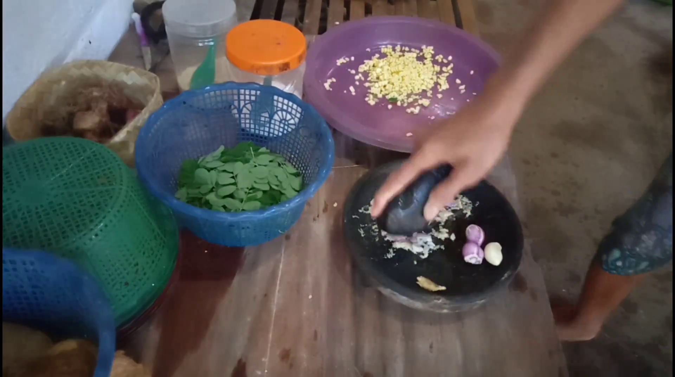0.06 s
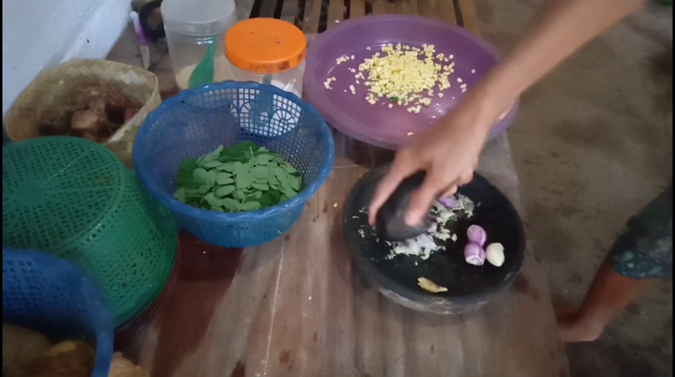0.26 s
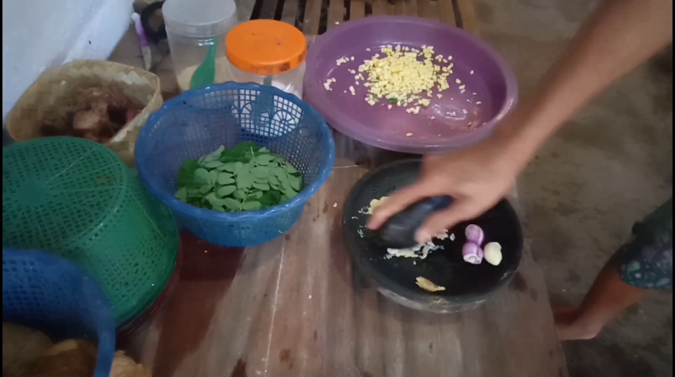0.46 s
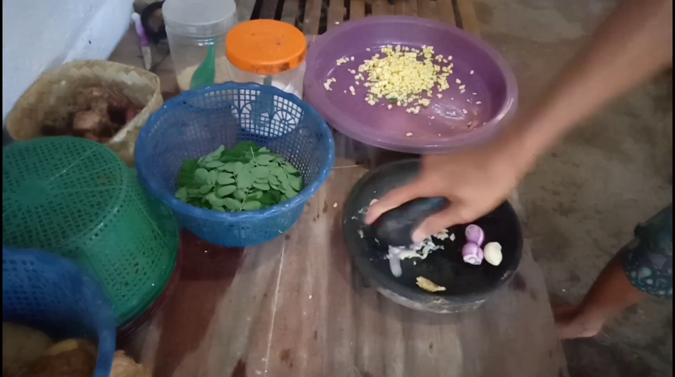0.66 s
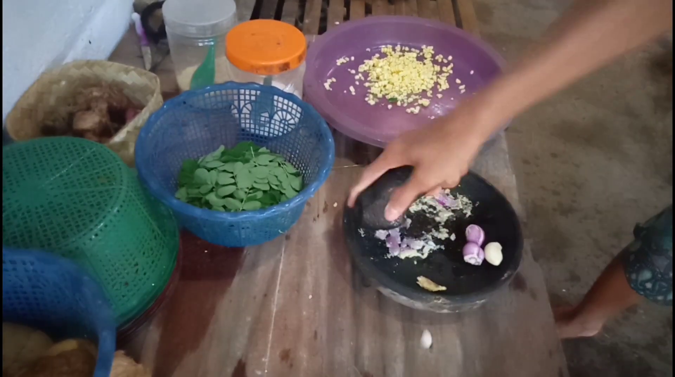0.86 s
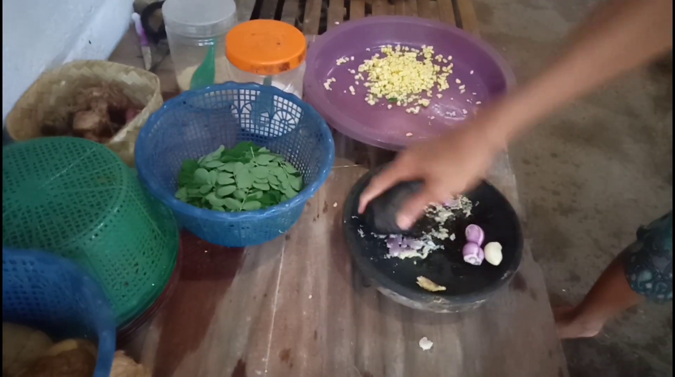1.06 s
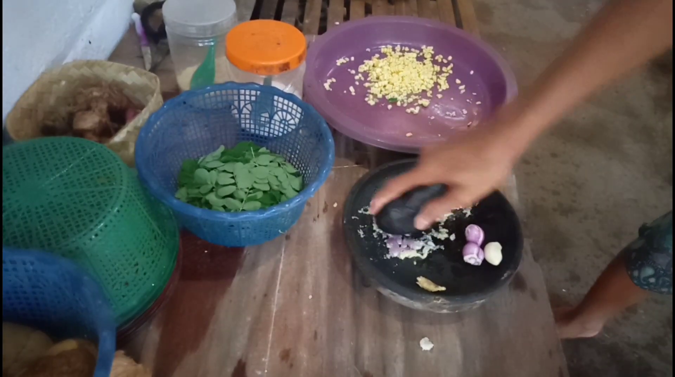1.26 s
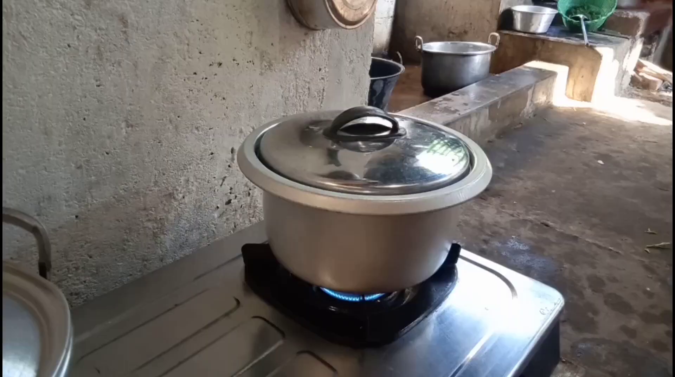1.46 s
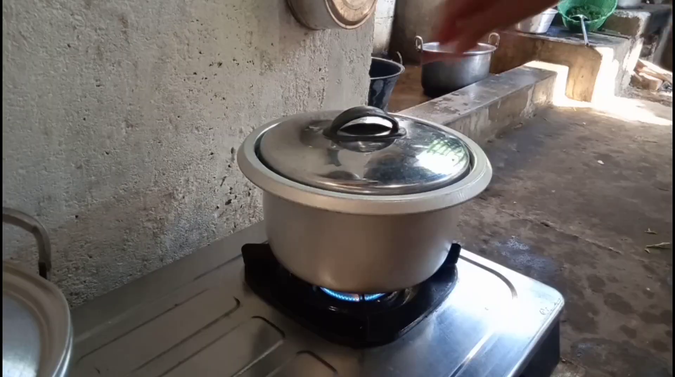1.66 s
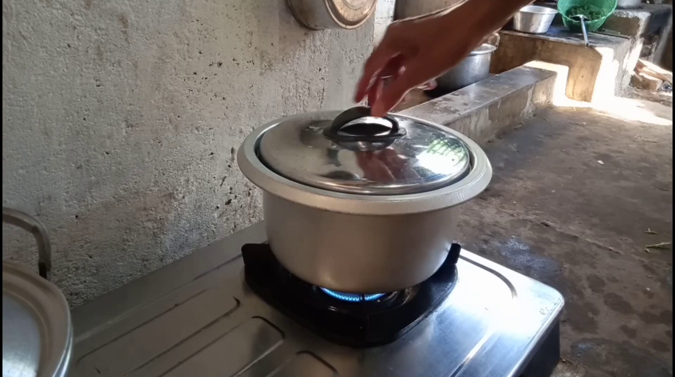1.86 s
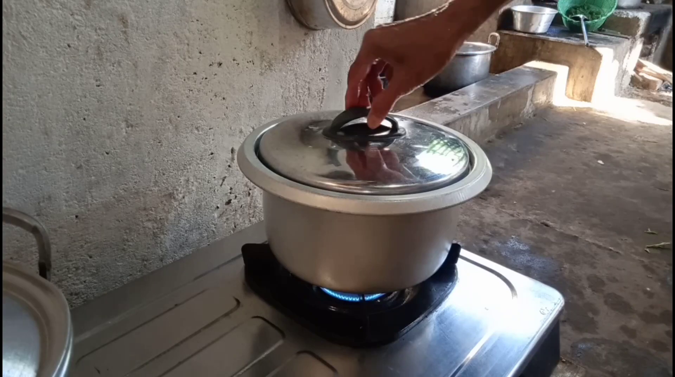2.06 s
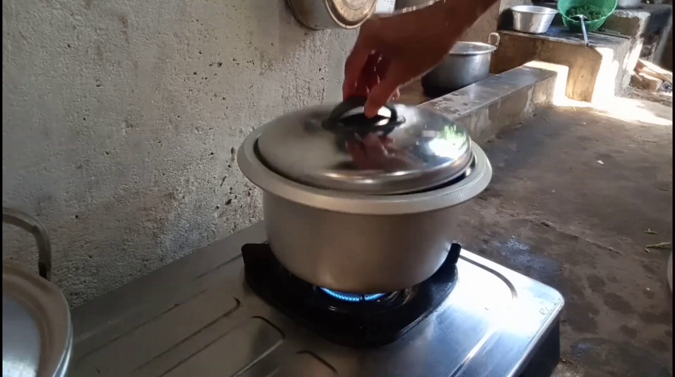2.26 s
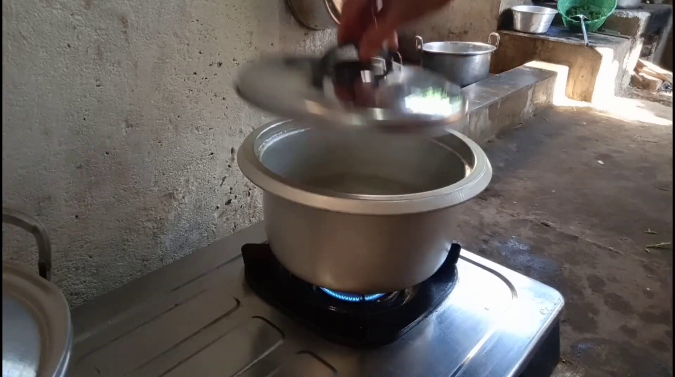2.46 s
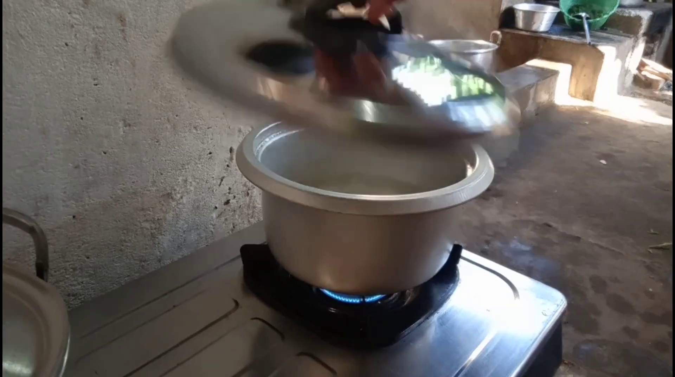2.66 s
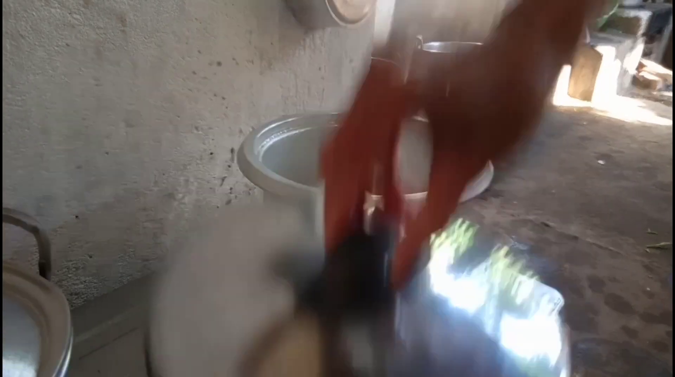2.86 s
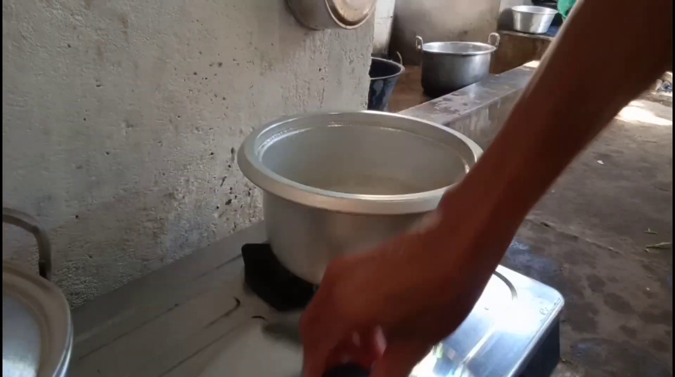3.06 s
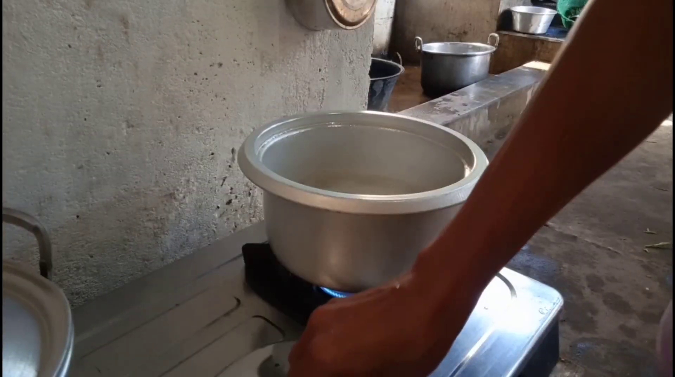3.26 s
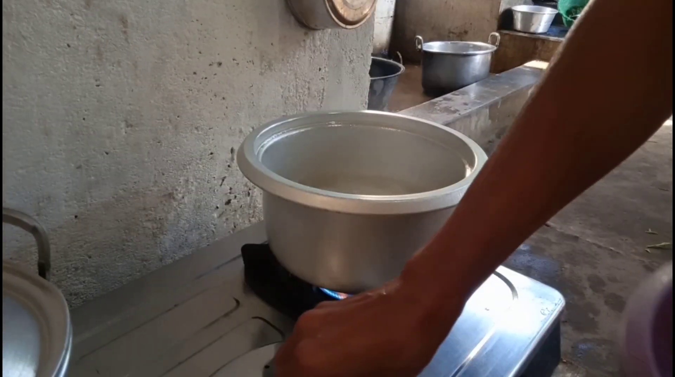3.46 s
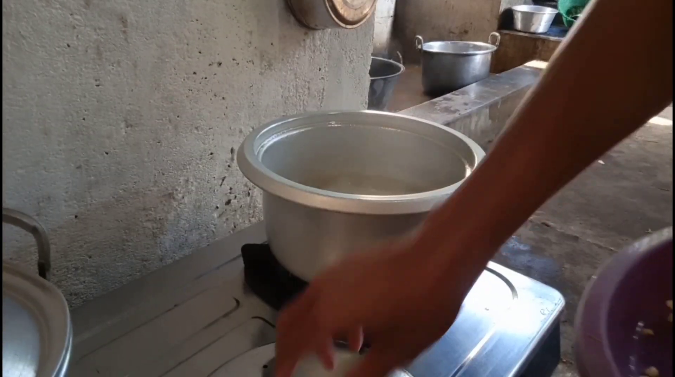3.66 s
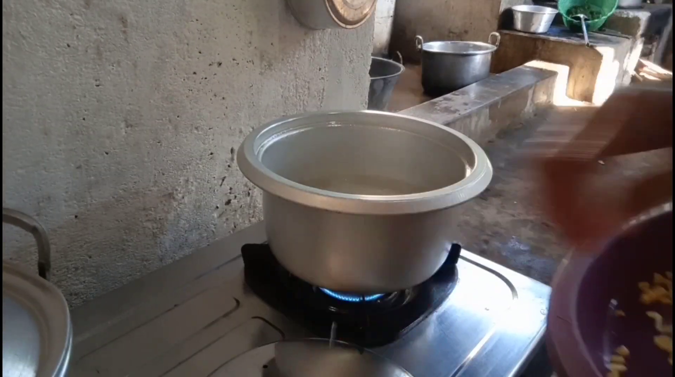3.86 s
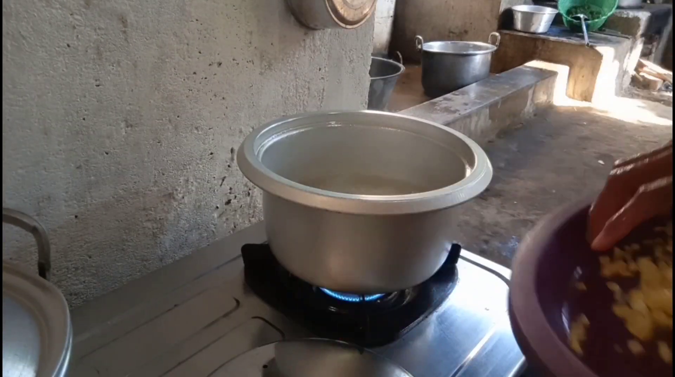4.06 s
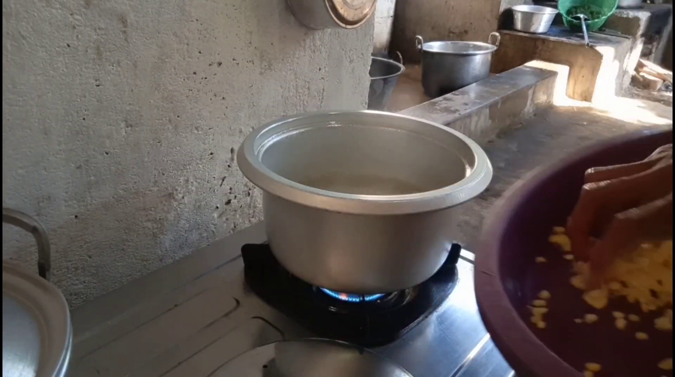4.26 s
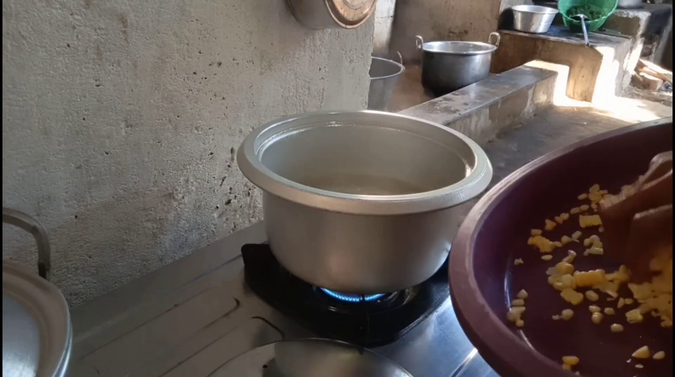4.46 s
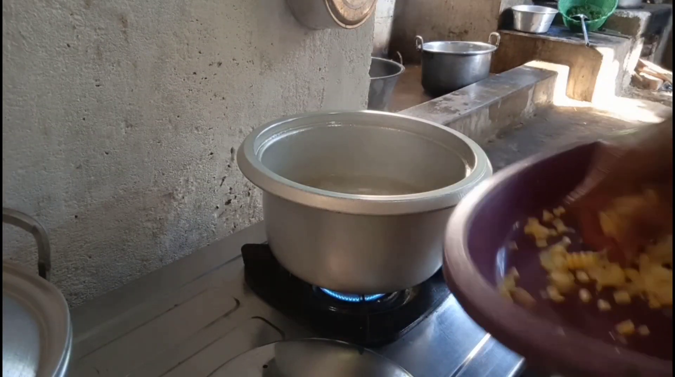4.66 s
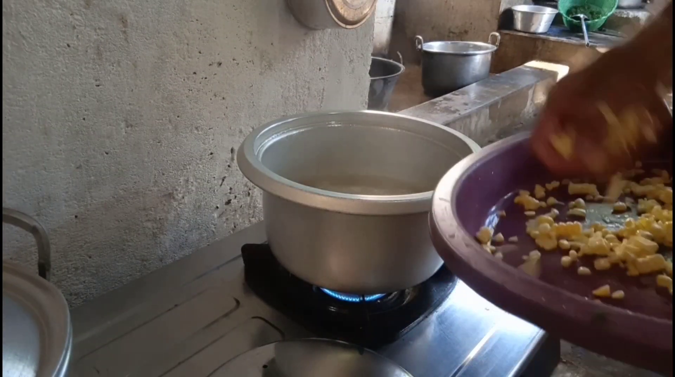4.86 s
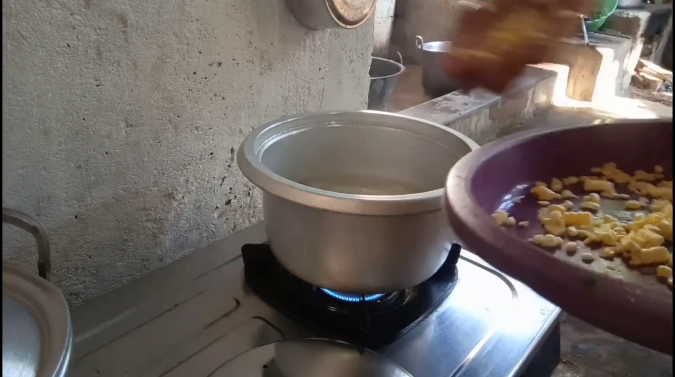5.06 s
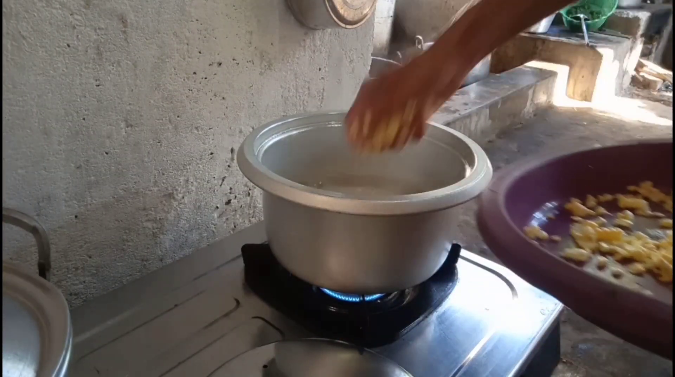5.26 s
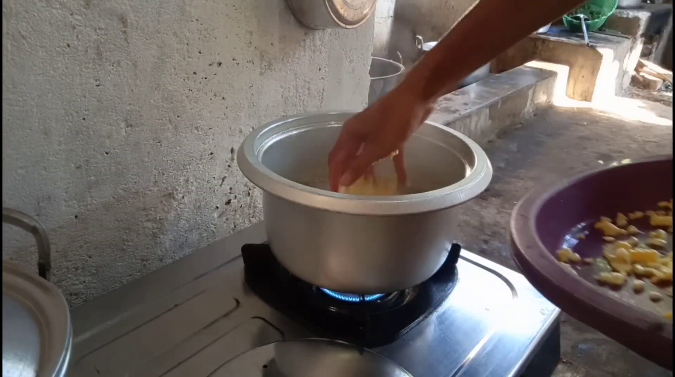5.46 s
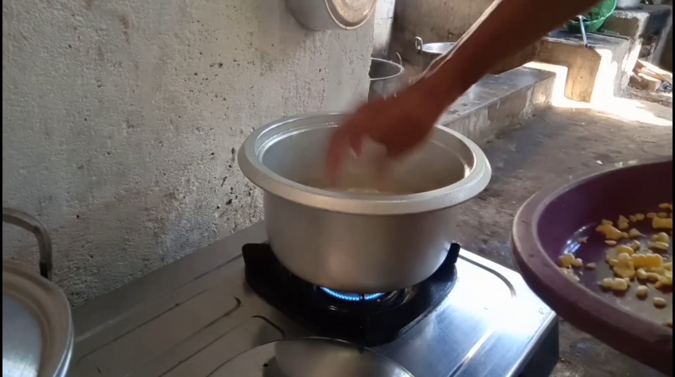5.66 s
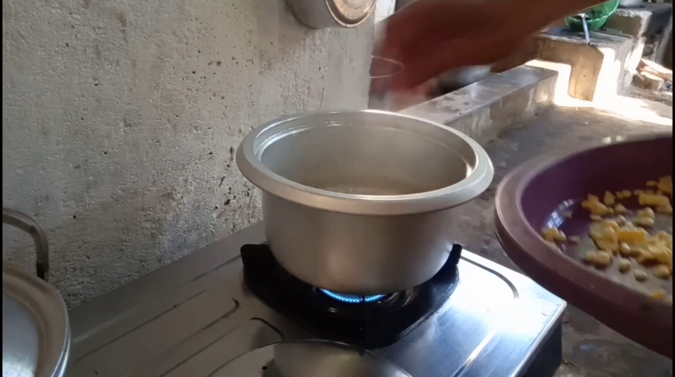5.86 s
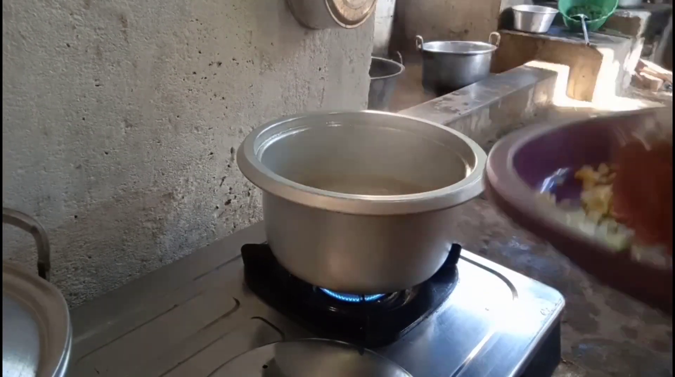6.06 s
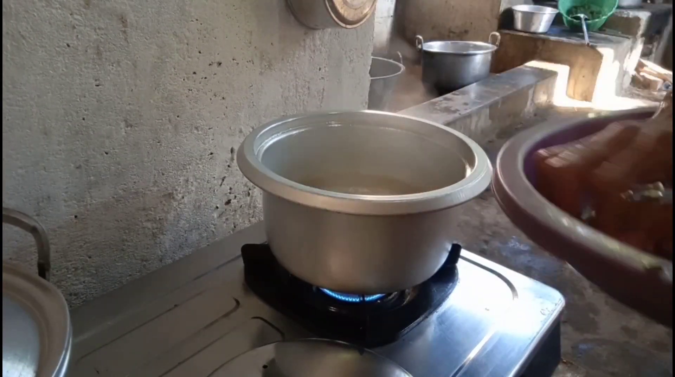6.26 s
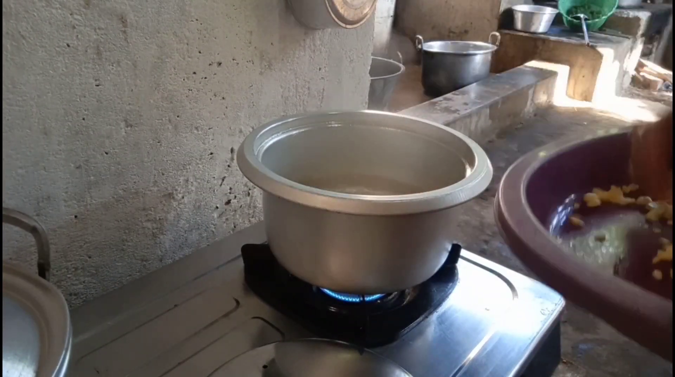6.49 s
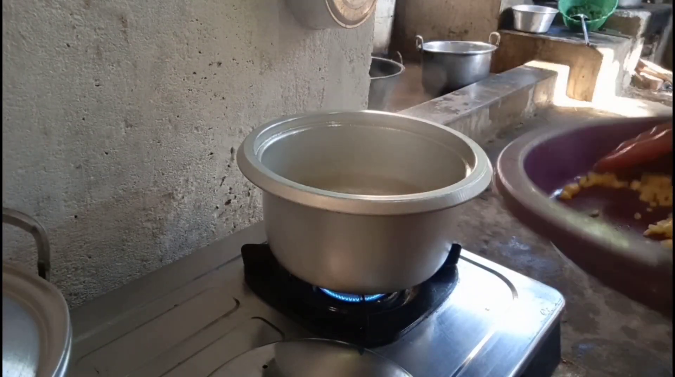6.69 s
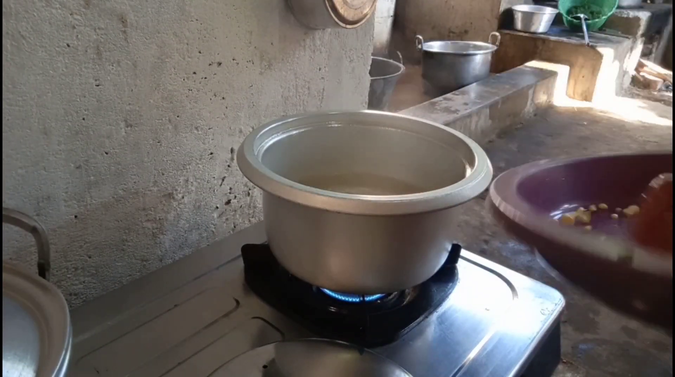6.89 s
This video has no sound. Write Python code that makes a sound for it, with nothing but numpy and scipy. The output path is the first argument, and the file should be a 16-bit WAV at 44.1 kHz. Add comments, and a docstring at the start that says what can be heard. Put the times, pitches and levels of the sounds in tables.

```python
"""Mortar, then a stove and a pot lid

A stone pestle pounds spices in a stone mortar on a wooden bench: struck modes ring and noise crunches.
That scene drops to near silence; a gas stove in a kitchen fades in as coloured noise. A hand rubs a pot lid
(noise), clinks it and sets it on a steel counter (struck modes, noise bursts), then scoops corn kernels from
a plastic tray (taps, rustle, gliding tones). Insects chirr outside: a far chorus, then also near calls."""
import sys
import numpy as np
from scipy import signal
from scipy.fft import rfft, irfft
from scipy.io import wavfile

SR = 44100
rng = np.random.default_rng(int(sys.argv[2]) if len(sys.argv) > 2 else 0)


def wav_out(sig):
    """Save sig, one row per channel (or a flat mono array), as 16-bit PCM at SR to the path in sys.argv[1]."""
    wavfile.write(sys.argv[1], SR, np.round(np.clip(np.atleast_2d(sig).T, -1, 1) * 32767).astype(np.int16))


N = 305613  # length in samples

# Source levels and spectra are relative; the functions below may add gains of their own.

# Level curve of the mortar scene, with a brief dip before the last blow. Each row: time in seconds, gain in dB.
MORTAR_GAIN = [(0, -1.5), (1.278, -1.5), (1.283, -21), (1.303, -12), (1.305, -4.5), (1.49, 0),
               (1.4995, -4.5), (1.5, -36), (1.515, -43.5), (1.517, -74.5)]
# Level curve of the stove scene. Each row: time in seconds, gain in dB.
STOVE_GAIN = [(1.579, -72.5), (1.581, -21), (1.595, -19), (1.68, -5), (1.8, -0.5), (1.95, 0), (7, 0.5)]

# Air at the bench. Each row: frequency in Hz, density in dB per Hz.
YARD_SPECTRUM = [(30, -14.5), (130, 9.5), (260, 0.5), (410, -4.5), (800, -9.5), (1700, -18), (3400, -14),
                 (5600, -31.5), (7100, -10), (9000, -33.5), (15500, -31)]
YARD_DB = -52
CHIRR_HZ, CHIRR_WIDTH_HZ, CHIRR_DB = 7000, 110, -53.5
# Flame, simmer and insect chorus. Each row: frequency in Hz, density in dB per Hz.
STOVE_SPECTRUM = [(30, -16), (102, 1.5), (237, 1), (324, -4.5), (691, -7.5), (874, -15), (1330, -13.5),
                  (1640, -18.5), (3230, -16), (5000, -23.5), (6100, -15), (7300, -7), (8300, -13),
                  (9500, -26), (15500, -27)]
# Changing stove noise. Each row: time in seconds, bass level in dB, treble level in dB.
STOVE_LEVEL = [(1.9, -48, -54), (2.3, -44, -48.5), (2.9, -49.5, -54), (4.4, -48.5, -53), (5.65, -48, -54),
               (5.96, -50.5, -61), (6.2, -50, -59.5), (6.6, -46, -56), (6.93, -46.5, -52.5)]

# Pace of the insect that ticks twice. Each row: time of the second tick in seconds, call number, level in dB.
TICK_PACE = [(1.666, 0, -38), (3.158, 12, -38), (3.665, 16, -38), (4.278, 21, -37), (4.775, 25, -37),
             (5.264, 29, -37), (5.501, 31, -37.5), (6.0, 35, -39), (6.247, 37, -38.5), (6.503, 39, -37),
             (6.872, 42, -38)]
# Pace of the insect with a short falling buzz. Each row: time in seconds, call number, level in dB.
BUZZ_PACE = [(1.659, 0, -51), (2.169, 4, -50), (2.432, 6, -52), (2.569, 7, -44.5), (2.961, 10, -45),
             (3.347, 13, -46), (3.63, 15, -47), (4.018, 18, -46.5), (4.511, 22, -46), (5.025, 26, -47),
             (5.521, 30, -47), (6.918, 41, -45.5)]
# Strokes of one buzz. Each row: delay in seconds, pitch in Hz, level in dB.
BUZZ_STROKES = [(-.006, 7245, 7), (.001, 6680, 7), (.008, 6450, -2)]
CALL_SCATTER_DB = 0.1

# Partials of a small tap. Each row: frequency ratio, level in dB.
TAP_PARTIALS = [(.68, -10), (1, 3.5), (1.45, -1), (2.4, -2.5), (4.6, -24.5)]
# Kernels, tray and fingers tapping. Each row: time in seconds, level in dB, pitch in Hz, tick level in dB.
TRAY_TAPS = [(1.688, -21, 1120, -42), (1.849, -41, 450, -33), (4.236, -20.5, 1150, -44),
             (4.441, -32, 690, -49), (4.464, -36, 398, -30.5), (4.493, -33, 1400, -53),
             (4.6, -29.5, 834, -59), (4.669, -20, 760, -59), (4.727, -29, 850, -61),
             (4.753, -26.5, 544, -59), (4.768, -27, 697, -61), (4.916, -30, 546, -62),
             (5.041, -19.5, 834, -58), (5.045, -29.5, 703, -62), (5.113, -32, 800, -56),
             (5.558, -37.5, 536, -57), (5.588, -44, 686, -38), (6.221, -25, 2620, -61),
             (6.472, -29, 730, -50), (6.514, -30, 867, -39), (6.549, -28, 754, -60), (6.589, -27, 780, -65),
             (6.685, -8, 2800, -38), (6.693, -7.5, 2480, -52), (6.816, -26, 1000, -61),
             (6.919, -40, 676, -34.5)]
# Faint kernel taps at random moments. Each row: start in seconds, end in seconds, taps per second, level in dB.
PATTER = [(4.3, 4.902, 11.5, -36), (5.05, 5.8, 9, -46), (6.4, 6.644, 7.7, -36)]
# Pitches of the faint tray taps: a single list in Hz.
TRAY_HZ = [415, 535, 680, 830]
PATTER_TICK_DB = -49
# Kernels shifting. Each row: time in seconds, dull level in dB, bright level in dB.
RUSTLE_LEVEL = [(4.1, -69, -75), (4.22, -58, -60.5), (4.68, -50, -57.5), (5.23, -63, -68), (5.52, -63, -62),
                (5.6, -59, -52.5), (5.68, -63.5, -63), (6.12, -64.5, -65.5), (6.57, -49.5, -50.5),
                (6.76, -58, -87), (6.93, -50.5, -56)]
# Dull and bright rustle. Each row: frequency in Hz, density in dB per Hz.
DULL_RUSTLE = [(150, -2.0), (400, 3.5), (800, 2.5), (1500, -1.5), (3000, -32), (9000, -53)]
BRIGHT_RUSTLE = [(800, -17), (2000, 6.5), (3500, 6.5), (5000, -11.5), (8000, -4), (15000, -20.0)]
# Whistly strands as fingers scrape the tray. Each row: start in seconds, end in seconds, start pitch in Hz,
# end pitch in Hz, level in dB.
SCRAPE_STRANDS = [(6.239, 6.327, 2860, 2780, -57), (6.342, 6.482, 2720, 3040, -45.5),
                  (6.351, 6.428, 2180, 2360, -55.5), (6.445, 6.619, 3750, 3280, -47),
                  (6.457, 6.607, 3220, 2980, -43), (6.569, 6.684, 2720, 2485, -47.5),
                  (6.578, 6.684, 3120, 2900, -48.5), (6.623, 6.679, 2150, 2130, -53),
                  (6.698, 6.758, 1766, 1765, -50), (6.694, 6.761, 2500, 2430, -65),
                  (6.70, 6.842, 3970, 3670, -63), (6.74, 6.87, 3290, 3460, -54),
                  (6.806, 6.954, 3050, 2800, -53)]

# Pestle blows. Each row: time in seconds, crack level in dB, bench thump in dB, stone ring in dB.
BLOWS = [(0.001, -53, -30, -85.5), (0.2314, -20, -24, -53), (0.4906, -24, -27.5, -56),
         (0.774, -12.5, -19, -32.5), (1.0591, -14.5, -22.5, -41.5), (1.3066, -20.5, -29.5, -7.5),
         (1.3124, -25.5, -43.5, -12.5)]
# Modes of the wooden bench. Each row: frequency in Hz, level in dB, 60 dB decay time in seconds.
BENCH_MODES = [(96.2, -14.5, 0.54), (129.5, -6, 0.41), (144.4, -6, 0.29), (164.9, -10, 0.45),
               (197.4, -3.5, .25), (278.4, -23.5, 0.14), (399.6, -15, 0.094), (482, -19, 0.17),
               (810, -16.5, 0.069)]
# Modes of the stone mortar. Each row: frequency in Hz, level in dB, 60 dB decay time in seconds.
STONE_MODES = [(730, -29.5, 0.31), (1247, -20, 0.022), (1200, -30, 0.086), (1394, -19.5, 0.15),
               (1620, -3.5, 0.027), (1496, -13, 0.037), (1850, -11.5, 0.039), (3106, -13.5, 0.056),
               (2010, -13, 0.014), (2285, -22.5, 0.28), (2299, -22.5, 0.45), (2280, 3.5, 0.033),
               (3695, -19.5, 0.28), (3838, -19.5, 0.3), (3840, 1, 0.044), (4220, -38, 0.23),
               (5300, -21.5, 0.037), (7373, -21, 0.16)]
# Crack of a blow. Each row: frequency in Hz, density in dB per Hz.
CRACK_SPECTRUM = [(180, -30.5), (300, -17), (620, -13.5), (1870, -19.5), (2320, -20), (3130, -17),
                  (3750, -13.5), (5850, -18.5), (7620, -2.5), (9600, -20), (15500, -24)]
# Crunch of spice. Each row: frequency in Hz, density in dB per Hz.
CRUNCH_SPECTRUM = [(150, -13), (400, 2), (700, -9), (1300, -8.5), (2200, -13.5), (3700, -12.5),
                   (5000, -24.5), (7600, -13), (9500, -29.5), (15500, -40)]
# Spice crushed under the pestle. Each row: start in seconds, level in dB, fade in dB per second.
CRUSHES = [(0.001, -39.5, 181), (.232, -35.5, 120), (.492, -43, 200), (.6, -50, 130), (.776, -29.5, 230),
           (.86, -54, 72), (.955, -42, 600), (1.018, -46, 594), (1.061, -33, 142.5), (1.31, -45, 123)]
# Snaps and small taps at the mortar. Each row: time in seconds, level in dB, pitch in Hz, tick level in dB.
SNAPS = [(.28, -29, 3170, -32), (.298, -22, 8200, -44), (.308, -21.5, 7800, -42), (.34, -35, 3000, -44),
         (.319, -39, 3500, -50), (.52, -26, 4200, -30.5), (.545, -35, 3900, -43), (.567, -14, 7850, -37),
         (.576, -42, 4400, -33), (.62, -29.5, 4170, -36), (.645, -42, 1900, -46), (.855, -34.5, 4480, -32),
         (.918, -34, 2600, -38), (.954, -27, 770, -62), (1.017, -27, 1040, -61), (1.125, -34, 8900, -41),
         (1.152, -32, 7500, -39), (1.209, -26, 4180, -31)]
# Faint whistles near the bench. Each row: start in seconds, end in seconds, start pitch in Hz,
# end pitch in Hz, level in dB.
WHISTLES = [(.07, .14, 5000, 5140, -61), (.12, .21, 3100, 3650, -72), (.53, .57, 3900, 3900, -56),
            (.3, .77, 2570, 2570, -69), (.95, 1.06, 3370, 3430, -73), (.97, 1.3, 2550, 2530, -73)]

# Hand sliding onto the lid. Each row: time in seconds, level in dB.
RUB_LEVEL = [(1.8, -80), (1.818, -51.5), (1.896, -52), (2.024, -27.5), (2.092, -31), (2.18, -54),
             (2.2, -70)]
# Colour of the rub and scrape. Each row: frequency in Hz, density in dB per Hz.
RUB_SPECTRUM = [(180, -29), (300, -33), (397, -28), (581, -14), (674, -18), (877, -14.5), (3400, -1.5),
                (4800, -11), (7620, 1.5), (9600, -12), (15500, -15)]
# Lid scraping the rim. Each row: start in seconds, level in dB, fade in dB per second.
SCRAPES = [(2.19, -54, 138), (2.27, -46.5, 300), (2.336, -30, 182)]
# Lid against pot. Each row: time in seconds, level in dB, brightness in dB.
CLINKS = [(2.1899, -16, -34), (2.2028, -19.5, -22), (2.2545, -28, -7), (2.2592, -21.5, -16),
          (2.2841, -17.5, -33), (2.3374, -19, 0.5), (2.349, -23, -23), (2.3646, -22, -13),
          (2.383, -24.5, 2), (2.3997, -24.5, 3.5), (2.4137, -32, 2)]
# Modes of the lid. Each row: frequency in Hz, level in dB, 60 dB decay time in seconds.
LID_MODES = [(449, -8.5, 0.095), (697, -12, 0.18), (1013, -9.5, 0.095), (1385, -21, 1.77), (1428, -3, 0.26),
             (1470, -2.5, 0.29), (1561, -4.5, 0.31), (1620, -14, 0.59), (1720, -12, 0.14),
             (2610, -18.5, 0.2), (3180, -29, 0.34), (3376, -16.5, 0.58), (3800, -8.5, 0.043),
             (4190, 0, 0.033), (4246, -12, 0.33), (5450, -15.5, 0.11), (7660, -3.5, 0.044),
             (7680, -6, 0.093), (7900, -12, 0.068), (8550, -5.5, 0.057)]
# Lid landing on the counter. Each row: time in seconds, level in dB, brightness in dB.
SET_DOWN = [(3.422, -10.5, -14.5), (3.445, -19, -40), (3.459, -5.5, -15), (3.484, 0.5, -16.5),
            (3.499, -16.5, -10), (3.515, -16.5, -24), (3.539, -18, -26), (3.5997, -11.5, -14),
            (3.65, -26, -30)]
# Modes of the counter. Each row: frequency in Hz, level in dB, 60 dB decay time in seconds.
COUNTER_MODES = [(169.1, -2.5, 0.58), (227, -14, 0.22), (257.5, -8.5, 0.22), (446, -10, 0.28),
                 (511, -8, 0.24), (609, -6, 0.13), (706, 2.5, 0.17), (751, -7, 0.14), (775, -6, .1),
                 (1434, -1, 0.11)]
# Dense modes of the steel sheet. Each row: frequency in Hz, density in dB per Hz.
SHEET_SPECTRUM = [(59, -53), (100, -3), (162, -4), (411, -10.5), (697, -5.5), (861, -15.5), (1230, -15),
                  (1460, -10.5), (1690, -17.5), (2420, -14), (4960, -26), (6300, -31), (7800, -19),
                  (9500, -33), (12000, -37), (15500, -35)]
# the counter shakes on after the lid lands
RUMBLE_S, RUMBLE_DB, RUMBLE_T60_S, RUMBLE_HZ = 3.5, -15, 0.85, 400

ROOM_T60_S = 0.36
CUTOFF_HZ = 16150  # stopband edge


def amp(db):
    """Level law: dB to amplitude gain."""
    return 10 ** (np.asarray(db) / 20)


def rms_one(x):
    """Normalisation: scaled to unit rms."""
    return x / np.sqrt(np.mean(x ** 2) + 1e-20)


def lowpass(x, order, hz):
    """Butterworth filtering: passes what lies below hz."""
    return signal.sosfilt(signal.butter(order, hz, fs=SR, output="sos"), x)


def highpass(x, order, hz):
    """Butterworth filtering: passes what lies above hz."""
    return signal.sosfilt(signal.butter(order, hz, "high", fs=SR, output="sos"), x)


def in_time(rows):
    """Linear interpolation: every column of a curve, per sample."""
    s, *columns = np.transpose(rows)
    return [np.interp(np.arange(N) / SR, s, column) for column in columns]


def sounding(rows):
    """Envelope: gain of the first level column, silent outside the curve."""
    t = np.arange(N) / SR
    return amp(in_time(rows)[0]) * (t > rows[0][0]) * (t < rows[-1][0])


def fading(rows):
    """Exponential decay: gain that jumps up at each row, then fades steadily in dB."""
    t = np.arange(N) / SR
    return sum(amp(db - fade * np.maximum(t - s, 0)) * (t > s) for s, db, fade in rows)


def add(out, s, sound):
    """Superposition: mixes a short sound in at s seconds."""
    i = int(s * SR)
    out[i:i + len(sound)] += sound[:max(N - i, 0)]


def colour(x, spectrum):
    """Minimum-phase filtering: shapes x to a spectrum; white noise keeps its rms."""
    hz = np.maximum(np.arange(2049) * SR / 4096, 1)
    points = np.array(spectrum)
    level_db = np.interp(np.log(hz), np.log(points[:, 0]), points[:, 1])
    cepstrum = irfft(np.log(amp(level_db)))
    # folding the cepstrum onto positive time makes the filter causal
    cepstrum[1:2048] *= 2
    cepstrum[2049:] = 0
    response = irfft(np.exp(rfft(cepstrum)))
    return signal.oaconvolve(x, response / np.linalg.norm(response))[:N]


def clicks(times, levels_db):
    """Impulses: single samples at the given moments."""
    out = np.zeros(N)
    at = np.clip((np.array(times) * SR).astype(int), 0, N - 1)
    np.add.at(out, at, amp(levels_db))
    return out


def ring(x, hz, t60):
    """Damped resonance: a unit click sets a decaying sine of height 1 ringing."""
    r, w = amp(-60 / (t60 * SR)), 2 * np.pi * hz / SR
    return signal.lfilter([0, np.sin(w)], [1, -2 * r * np.cos(w), r * r], x + 1e-18)


def burst(train, t60):
    """Decaying noise: each click opens white noise that dies away."""
    envelope = signal.lfilter([1], [1, -amp(-60 / (t60 * SR))], train + 1e-18)
    return envelope * rng.standard_normal(N)


def grains(per_s, spread_db):
    """Random impulse process: clicks of uneven size and sign; rms 1."""
    sizes = amp(spread_db * np.minimum(rng.exponential(1, N), 5)) * rng.choice([-1, 1], N)
    return rms_one(sizes * (rng.random(N) < per_s / SR))


def strike(times, levels_db, modes, uneven_db):
    """Modal excitation: each contact strikes every mode with a strength of its own."""
    chance = rng.normal(0, uneven_db, (len(times), len(modes)))
    out = np.zeros(N)
    for k, (hz, db, t60) in enumerate(modes):
        out += ring(clicks(times, levels_db + db + chance[:, k]), hz, t60)
    return out


def taps(rows, cycles):
    """Damping per cycle: higher partials of a small hard thing die sooner; a white noise tick joins them."""
    out, t = np.zeros(N), np.arange(1500) / SR
    for s, db, pitch_hz, _ in rows:
        for ratio, partial_db in TAP_PARTIALS:
            hz = pitch_hz * ratio
            if hz < 12000:
                decay = amp(db + partial_db - 60 * t * hz / cycles)
                onset = np.minimum(t * hz, 1)  # rises over one cycle
                add(out, s + .0012, decay * np.sin(2 * np.pi * hz * t) * onset)
    s, _, _, tick_db = np.transpose(rows)
    return out + burst(clicks(s + 0.0011, tick_db), 0.011)


def glide(out_len, start_hz, end_hz, width_hz):
    """Narrow-band modulation: slow noise roughens a swelling, gliding tone to the given width."""
    phase = 2 * np.pi * np.cumsum(np.linspace(start_hz, end_hz, out_len)) / SR
    white = rng.standard_normal((2, out_len + 2000))
    slow = rms_one(lowpass(white, 2, width_hz / 2)[:, 2000:])  # the filter's onset is dropped
    swell = signal.windows.tukey(out_len, .3)
    return swell * (slow[0] * np.sin(phase) + slow[1] * np.cos(phase))


def strands(rows, width_hz):
    """Superposition: rough gliding tones from a table."""
    out = np.zeros(N)
    for start, end, start_hz, end_hz, db in rows:
        add(out, start, amp(db) * glide(int((end - start) * SR), start_hz, end_hz, width_hz))
    return out


def radiate(x, low_hz):
    """Radiation efficiency: small struck things push no deep bass into the air."""
    return highpass(x, 4, low_hz)


def room(x):
    """Diffuse reverberation: a decaying noise tail of unit energy that grows duller with time."""
    t = np.arange(int(ROOM_T60_S * SR)) / SR
    white = rng.standard_normal((2, len(t))) * (t > .006)
    dull = lowpass(white[0], 1, 2500) * amp(-60 * t / ROOM_T60_S)
    full = 0.91 * white[1] * amp(-60 * t / (0.77 * ROOM_T60_S))
    tail = dull + full
    return signal.oaconvolve(x, tail / np.linalg.norm(tail))[:N]


def yard():
    """Stationary noise: steady air, and a far insect chorus as grains ringing one narrow band."""
    chorus = ring(grains(1100.0, 3.), CHIRR_HZ, 2.2 / CHIRR_WIDTH_HZ)
    air = colour(rng.standard_normal(N), YARD_SPECTRUM)
    return amp(YARD_DB) * air + amp(CHIRR_DB) * rms_one(chorus)


def stove_air():
    """Band splitting: flame rumble below, simmer and chorus above, each with its own level curve."""
    bass_db, treble_db = in_time(STOVE_LEVEL)
    noise = colour(grains(14000., 1.96), STOVE_SPECTRUM)
    low = lowpass(noise, 2, 1200)
    return amp(bass_db - 4.0) * rms_one(low) + amp(treble_db + 3) * rms_one(noise - low)


def calls_at(pace):
    """Regular rhythm: time and level of every call, evenly spaced between the rows."""
    s, number, db = np.transpose(pace)
    every = np.arange(number[-1] + 1)
    return zip(np.interp(every, number, s), np.interp(every, number, db))


def wing_stroke(out, s, hz, db, seconds):
    """Stridulation: wing teeth ring a near-pure note that sags, centred on s."""
    t = np.arange(int(seconds * SR)) / SR
    pitch, level, phase = rng.normal(0, 1, 3)
    note = np.sin(2 * np.pi * hz * (1 + .012 * pitch) * t * (1 - 4.5 * t) + 3 * phase)
    gain = amp(db + CALL_SCATTER_DB * level)
    add(out, s - seconds / 2, gain * np.hanning(len(t)) * note)


def insects():
    """Pulse trains: one insect ticks twice, 20 ms apart; the other's strokes fall in pitch and trail off."""
    out = np.zeros(N)
    for s, db in calls_at(TICK_PACE):
        wing_stroke(out, s - .02, 6970, db - 5.5, 0.0087)
        wing_stroke(out, s, 7150, db, 0.012)
    for s, db in calls_at(BUZZ_PACE):
        for delay, hz, stroke_db in BUZZ_STROKES:
            wing_stroke(out, s + delay, hz, db + stroke_db, .006)
        trail = glide(int(0.028 * SR), 6150, 6350, width_hz=410)
        add(out, s - .004, amp(db - 8.5) * trail)
    return out


def patter():
    """Random scatter: rows of faint taps within each span, each at one of the tray's pitches."""
    rows = []
    for start, end, per_s, db in PATTER:
        for when, size, pick in rng.random((round(per_s * (end - start)), 3)):
            s = start + when * (end - start)
            hz = TRAY_HZ[int(pick * len(TRAY_HZ))]
            rows.append((s, db + 5.7 * (size - .5), hz, PATTER_TICK_DB))
    return rows


def tray():
    """Impact and friction: kernels tap and shift; scraping fingers whistle in short strands."""
    dull_db, bright_db = in_time(RUSTLE_LEVEL)
    after = np.arange(N) > RUSTLE_LEVEL[0][0] * SR
    dull = colour(grains(600., 1.5), DULL_RUSTLE)
    bright = colour(grains(4000., 4.8), BRIGHT_RUSTLE)
    rustle = after * (amp(dull_db) * dull + amp(bright_db) * bright)
    return taps(TRAY_TAPS + patter(), cycles=8.7) + rustle + strands(SCRAPE_STRANDS, width_hz=180)


def lid_on_pot():
    """Friction and modal ringing: the hand rubs the lid, which scrapes and clinks on the pot."""
    rub = (sounding(RUB_LEVEL) + fading(SCRAPES)) * colour(grains(9000., 3.6), RUB_SPECTRUM)
    s, db, bright_db = np.transpose(CLINKS)
    low_modes = [mode for mode in LID_MODES if mode[0] < 2000]
    high_modes = [mode for mode in LID_MODES if mode[0] > 2000]
    clink = strike(s, db - 15.5, low_modes, uneven_db=4.5)
    clink += strike(s, db + bright_db - 6.0, high_modes, uneven_db=6.0)
    # the loose lid chatters on the rim between clinks
    contacts = fading(SCRAPES) * grains(249.2, 4.4)
    chatter = sum(amp(mode_db) * ring(contacts, hz, t60) for hz, mode_db, t60 in LID_MODES)
    return rub + clink + amp(-24.0) * chatter


def lid_on_counter():
    """Plate impact: low modes boom one by one, the dense modes of the sheet clatter as noise."""
    s, db, bright_db = np.transpose(SET_DOWN)
    s = s + .001
    boom = strike(s, db - 21.5, COUNTER_MODES, uneven_db=3.0)
    # the treble of the sheet dies sooner than its body
    body = lowpass(burst(clicks(s, db - 16), 0.22), 2, 3000)
    treble = highpass(burst(clicks(s, db + bright_db + 3.0), 0.15), 2, 3000)
    rumble = lowpass(burst(clicks([RUMBLE_S], [RUMBLE_DB]), RUMBLE_T60_S), 2, RUMBLE_HZ)
    return boom + colour(body + treble, SHEET_SPECTRUM) + rumble


def mortar():
    """Impact and fracture: blows crack, shake the bench and ring the stone; crushed spice crunches."""
    s, crack_db, bench_db, stone_db = np.transpose(BLOWS)
    crack = colour(burst(clicks(s, crack_db), 0.029), CRACK_SPECTRUM)
    # the mortar rocks and knocks the bench once more
    rock = rng.uniform(.012, .03, len(s))
    bench = strike(np.r_[s, s + rock], np.r_[bench_db, bench_db - 5.0], BENCH_MODES, uneven_db=1.5)
    stone = strike(s, stone_db, STONE_MODES, uneven_db=1)
    crunch = fading(CRUSHES) * colour(grains(2500., 2.9), CRUNCH_SPECTRUM)
    near = radiate(crack + stone + taps(SNAPS, cycles=12.7), low_hz=150)
    reverberant = amp(-9.5) * room(near)
    return near + reverberant + radiate(bench, low_hz=84.3) + crunch + strands(WHISTLES, width_hz=140)


def scene():
    """Superposition: the mortar and the stove scenes, each under its level curve."""
    near = radiate(lid_on_pot() + lid_on_counter() + tray(), low_hz=130)
    calls = insects()
    reverberant = room(amp(-11) * near + amp(-7) * calls)
    stove = near + calls + reverberant + stove_air()
    bench = mortar() + yard()
    return np.array([amp(in_time(MORTAR_GAIN)[0]) * bench + amp(in_time(STOVE_GAIN)[0]) * stove])


def record(dry):
    """Band limiting: the small microphone loses the deep bass; the top is cut."""
    thin = highpass(dry, 1, 40)
    return signal.sosfilt(signal.cheby2(18, 60, CUTOFF_HZ, fs=SR, output="sos"), thin)


dry = scene()
out = record(dry)
wav_out(out)
```